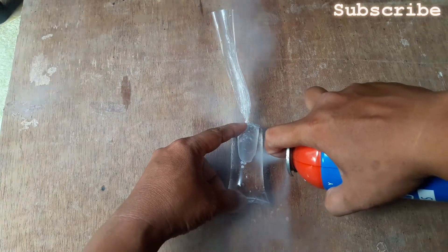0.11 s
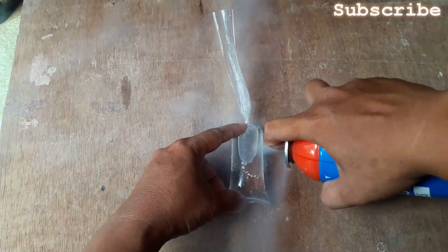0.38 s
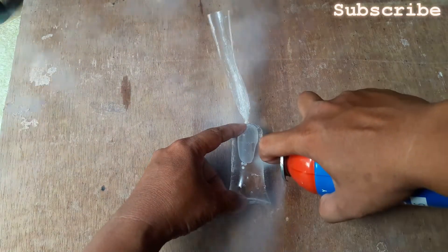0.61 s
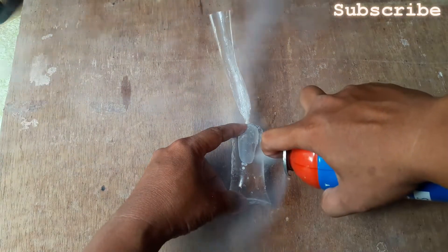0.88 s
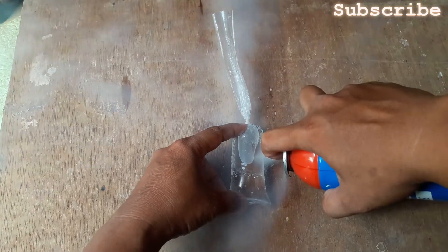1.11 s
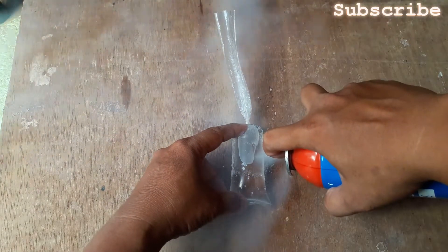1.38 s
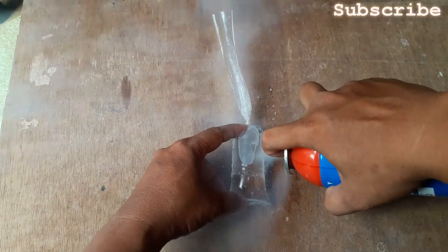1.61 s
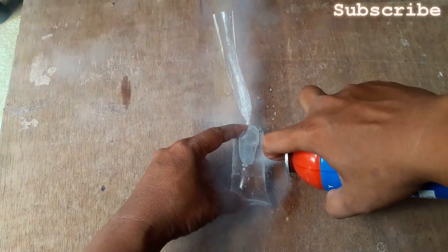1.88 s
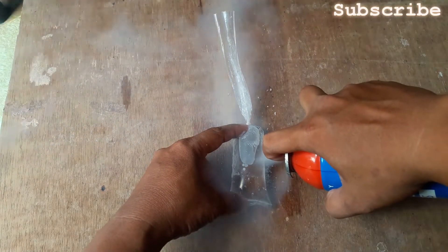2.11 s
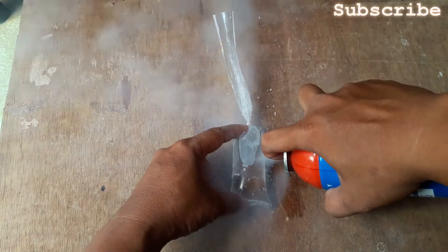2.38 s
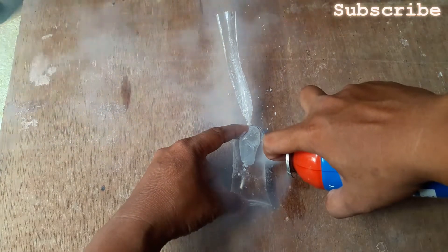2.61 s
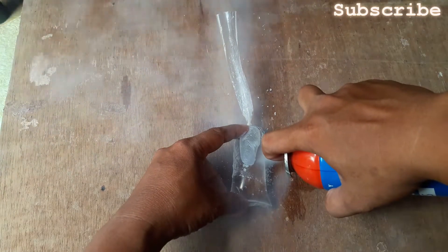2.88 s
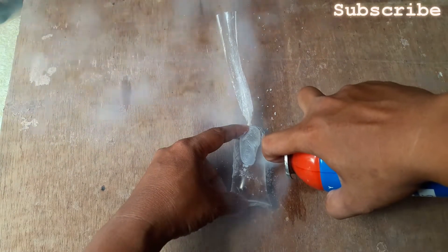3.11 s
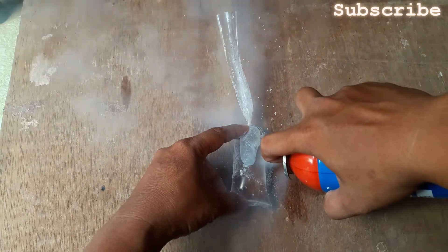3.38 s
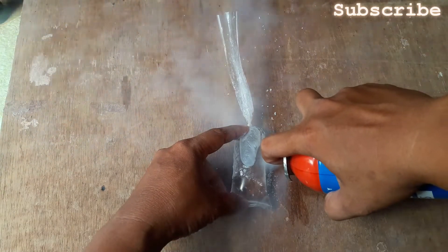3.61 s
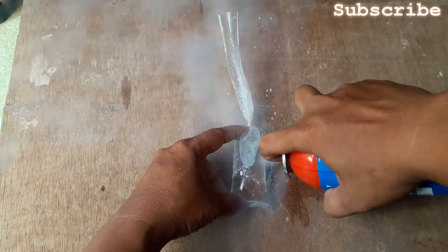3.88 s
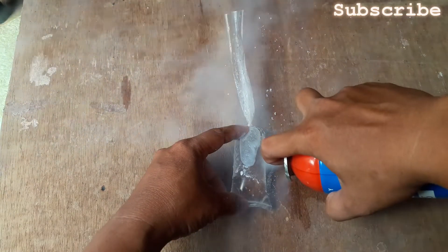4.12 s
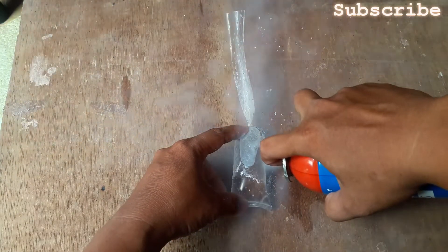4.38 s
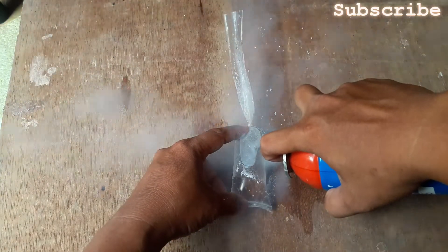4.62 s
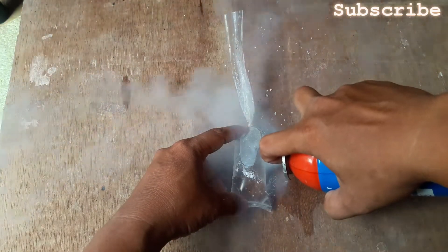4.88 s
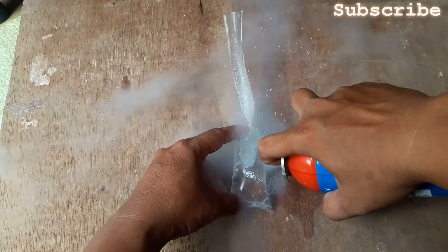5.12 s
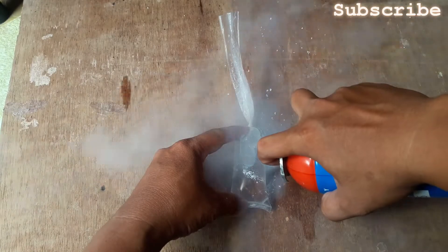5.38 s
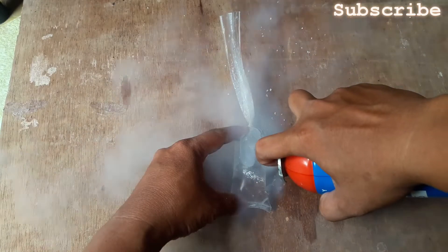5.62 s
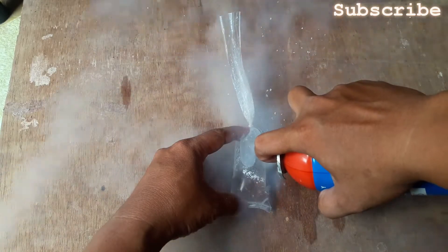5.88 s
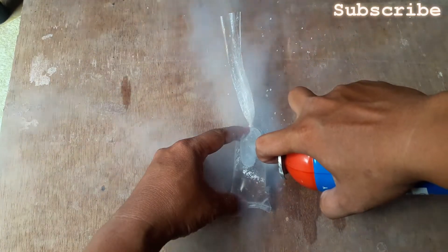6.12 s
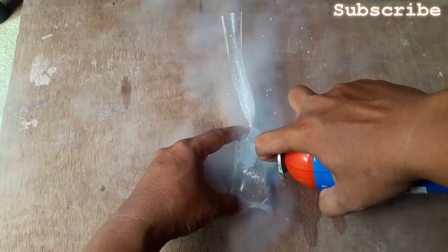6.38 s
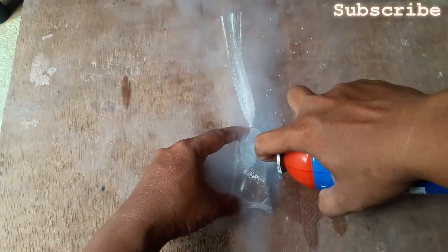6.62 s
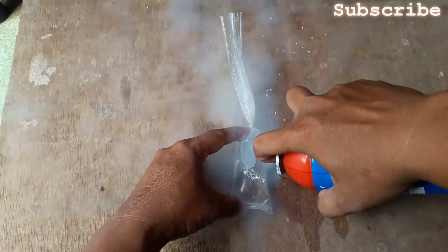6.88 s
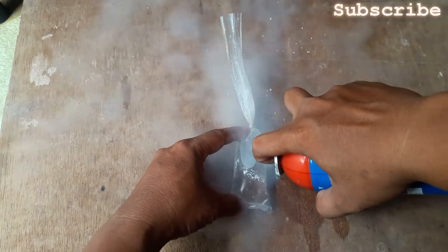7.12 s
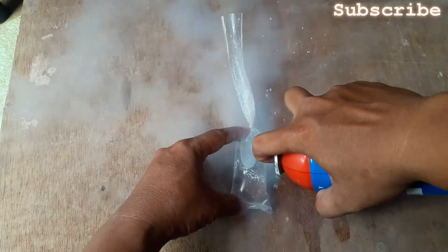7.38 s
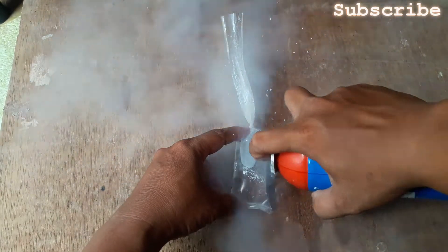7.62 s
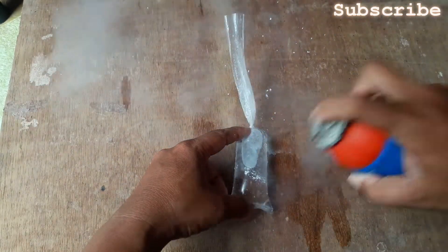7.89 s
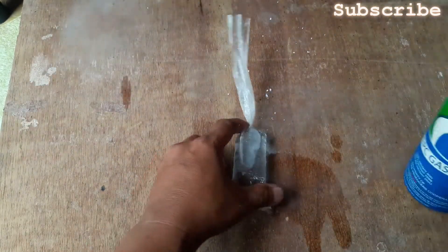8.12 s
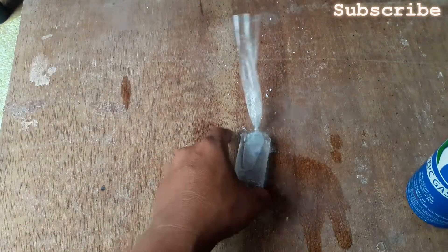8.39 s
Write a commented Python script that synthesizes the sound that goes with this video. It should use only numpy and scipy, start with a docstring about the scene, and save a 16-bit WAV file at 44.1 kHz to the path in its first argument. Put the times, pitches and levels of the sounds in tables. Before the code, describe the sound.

Very close to a stereo microphone, a gas can sprays a small water bag on a wooden table. The dense, bright hiss holds almost steady, with slight flutter and one brief spurt early on. It shuts off suddenly, leaving a quiet room, faint plastic ticks, a tiny squeak and rustling, then a hollow knock with a weaker touch as the can is set down.

```python
"""A gas canister sprays a steady jet against a small bag of water on a wooden table, close to a two-port microphone.
The jet is noise coloured for each port, with swell and flutter by band; a brief spurt is a second, louder noise.
The valve shuts; the chilled bag ticks (ringing snaps), squeaks (a gliding sine) and rustles (grainy noise).
The can is put down on the table with a hollow knock: soft clicks set the table's modes ringing.
A faint room noise, mains hum and a low drone, the last two made of sines, lie underneath."""
import sys
import numpy as np
from scipy import signal
from scipy.fft import rfft, irfft, next_fast_len
from scipy.io import wavfile

SR = 44100
rng = np.random.default_rng(int(sys.argv[2]) if len(sys.argv) > 2 else 0)


def to_wav(s):
    """Save 16-bit WAV."""
    ch = np.atleast_2d(s).T  # columns
    pcm = np.round(np.clip(ch, -1, 1) * 32767)  # PCM
    wavfile.write(sys.argv[1], SR, pcm.astype(np.int16))


def voltage_ratio(decibels):
    """Convert decibels (scalar or array-like) to amplitude ratios, 20 dB per decade."""
    exponent = np.asarray(decibels, float) / 20
    return 10 ** exponent


N = 375291
TIME = np.arange(N) / SR
SIZE = next_fast_len(N + SR // 4)  # room for a quarter second of echo
HZ = np.maximum(np.arange(SIZE // 2 + 1) * SR / SIZE, 1)

SHUT_S = 7.625  # the valve shuts
BASS_THINS_S, BASS_THINS_OVER_S = 1.3, 0.03  # the bass thins abruptly
# how far the left port leads the right: f/Hz, phase/rad
PORT_LEAD = [(100, -1), (3400, 0.5), (4200, 2), (5200, 0.84), (6300, 0.5), (8500, 3), (10200, -0.5),
             (12300, -2.5), (15300, 1.5)]


def rms_one(x):
    """Scale to unit rms of the two ports' mean."""
    return x / np.sqrt(np.mean(np.atleast_2d(x).mean(axis=0) ** 2) + 1e-20)


def heard(spectrum):
    """Spectrum back to samples."""
    return irfft(spectrum, SIZE)[..., :N]


def ramp(start_s, over_s):
    """Straight line from 0 to 1."""
    return np.clip((TIME - start_s) / over_s, 0, 1)


def in_time(rows):
    """Columns of a table as curves over all samples."""
    s, *columns = np.transpose(rows)
    return [np.interp(TIME, s, c) for c in columns]


def over_hz(points):
    """A two-column table read along log frequency."""
    hz, value = np.array(points).T
    return np.interp(np.log(HZ), np.log(hz), value)


def peaks_db(ripple):
    """Bell-shaped peaks and notches along frequency; each width is taken at half the dB height."""
    return sum(db / (1 + (2 * (HZ - hz) / width) ** 2) for hz, width, db in ripple)


def drift(rate):
    """Slow random wander of unit rms: noise through two equal low-pass poles at rate Hz."""
    step = 40  # samples from one drawn value to the next
    pole = np.exp(-2 * np.pi * rate * step / SR)
    noise = rng.standard_normal(N // step + 2002)
    slow = signal.lfilter([1], [1, -2 * pole, pole * pole], noise)[2000:]
    return np.interp(np.arange(N) / step, np.arange(len(slow)), rms_one(slow))


def ring(clicks, hz, t60):
    """Damped resonance: a unit click sets a sine of height 1 ringing, 60 dB down after t60 seconds."""
    radius = voltage_ratio(-60 / (t60 * SR))
    w = 2 * np.pi * hz / SR
    return signal.lfilter([0, np.sin(w)], [1, -2 * radius * np.cos(w), radius * radius], clicks + 1e-18)


def two_port_noise(alike, lead):
    """Spectra of white noise at both ports: a shared part, shifted in phase, and a part of their own."""
    shared, *own = rfft(rng.standard_normal((3, SIZE)))
    alike = np.clip(alike, 0, 1)
    shared_at_ports = shared * np.exp(0.5j * lead * [[1], [-1]])
    return np.sqrt(alike) * shared_at_ports + np.sqrt(1 - alike) * np.array(own)


def echoes(t60, level_db, alike_below_hz=700):
    """A dying spray of reflections, another one for each port; long waves pass with little of it."""
    t = np.arange(SR // 4) / SR
    tail = rng.standard_normal((2, len(t))) * voltage_ratio(-60 * t / t60) * (t > 0.001)
    tail *= voltage_ratio(level_db) / np.sqrt(np.sum(tail ** 2, axis=1, keepdims=True))
    return rfft(tail, SIZE) * HZ / np.hypot(HZ, alike_below_hz)


def jet(swell_db=0.17, patchy_db=0.5, flutter_db=0.51, spit_db=0.5, near_t60=0.044, near_db=-6):
    """Turbulent noise; the flow swells as a whole, wanders and flutters by band, spits as droplets pass the nozzle."""
    # broad colour of the jet at each port: f/Hz, relative level/dB
    colour_left = [(30, -51), (100, -49.5), (300, -31.5), (480, -22.5), (600, -15.5), (680, -11.5),
                   (1500, -3.5), (3500, 1.7), (4000, -2), (4150, -6.5), (5300, -12), (6500, -10),
                   (9000, -28), (12000, -9), (15600, -2)]
    colour_right = [(30, -50), (100, -49), (300, -29.5), (480, -23), (600, -19), (680, -9), (1500, -5),
                    (3500, 0), (4000, -5.5), (4150, -9.5), (5300, -17.5), (6500, -21), (9000, -20),
                    (12000, -4), (15600, 0)]
    # peaks and notches from bag, hands and table top on the way to each port: f/Hz, width/Hz, height/dB
    ripple_left = [(575, 155, -3.5), (824, 47, 7.5), (970, 110, 4), (1063, 69, -5), (1254, 130, -8.5),
                   (1338, 126, -10.5), (1540, 39, -6), (1682, 35, -16), (1970, 105, 4.5), (2206, 61, -12.5),
                   (2230, 84, -2), (2670, 100, 6.5), (2840, 72, -2.5), (2940, 120, -3.5), (3720, 260, 2),
                   (3898, 385, 7.5), (5500, 120, -10), (6640, 250, 3), (7500, 150, 5), (11240, 300, 5.5)]
    ripple_right = [(560, 66, 3.5), (600, 42, -3.5), (890, 39, -3), (1037, 40, 6.5), (1203, 69, -6.5),
                    (1493, 35, -15.5), (1630, 72, -12.5), (1870, 110, -3), (2070, 81, -4.5), (2260, 60, 3),
                    (2460, 88, 6), (2680, 126, -13.5), (3620, 91, -1), (3765, 82, 5), (4326, 450, 8),
                    (6160, 105, 5.5), (6200, 130, 10), (6260, 140, 4.5), (8160, 1200, 8), (9800, 440, -3.5)]
    # what is added while the can is still held in its first position: f/Hz, width/Hz, height/dB
    early_left = [(344, 590, 0.5), (810, 120, -3), (930, 120, -3.5), (1246, 130, 10), (1526, 190, 5.5),
                  (2640, 160, -3), (3520, 930, -2.5), (4310, 220, 1), (5510, 430, 5), (6100, 370, -6.5),
                  (6840, 250, 1.5), (12400, 280, -7)]
    early_right = [(353, 130, 2.5), (820, 100, -3.5), (1500, 120, 7), (1845, 280, 4.5), (3070, 540, -1),
                   (4000, 200, -7.5), (4530, 200, 6), (5200, 510, 4), (6020, 190, -17), (6700, 180, 10.5),
                   (8280, 410, -5.5), (9540, 150, 1.5)]
    # share of the direct jet that both ports hear alike: f/Hz, likeness/0-1
    likeness = [(60, 1), (300, 0.99), (1000, 0.79), (2500, 0.7), (4000, 0.79), (7000, 0.44), (11000, 0.75),
                (15500, 0.55)]
    # thumb on the valve and pressure in the cooling can; only the swing about the mean counts:
    # t/s, flow/dB, pressure as brightness/dB
    flow_rows = [(0.0, -18.5, -7), (0.29, -21, -2), (0.47, -18, -2), (0.55, -22.5, 0), (0.63, -21.5, -2),
                 (0.93, -20.5, 1.5), (1.31, -19.5, 0), (1.75, -19.5, 0.5), (2.09, -19, -3.5),
                 (2.14, -20.5, 1), (2.75, -19, -4), (2.84, -21, -1.5), (3.05, -20, -2.5), (5.42, -20, -5),
                 (7.54, -20.5, -3.5), (7.6, -21, -3.5)]
    # bands from low to high: level/dB, share of flow swing, share of pressure swing, drift of level/dB per s,
    # gain in the first position/dB
    jet_bands = [(-58, .3, 0.23, -.5, 0.5), (-53, .3, 0, 0, 4), (-31.5, 0.43, 0, -0.07, 2),
                 (-22.5, 1.1, 0.21, 0, -1), (-32.5, 1.4, 0.5, -.2, -1), (-30, 0.56, 0, 0.35, 2.5),
                 (-27, 0.99, 0.95, 0, -1), (-23.5, .9, 1.1, -2.1, -7.5)]
    # crossings between those bands: f/Hz
    band_edges_hz = [260, 500, 1700, 4100, 5500, 9000, 12500]
    # how much louder each band is until the bass thins: gain/dB
    bass_extra_db = [8, 3] + [0] * 6
    settles_from_s, settles_over_s = 1.54, 2.16
    fall_db_per_s = 700

    colour_db = [over_hz(colour_left) + peaks_db(ripple_left), over_hz(colour_right) + peaks_db(ripple_right)]
    direct = two_port_noise(over_hz(likeness), over_hz(PORT_LEAD)) * voltage_ratio(np.array(colour_db))

    # as the hands shift, one pattern of near reflections slowly gives way to another
    turn = 1.33 * drift(0.25)
    near = heard(direct * echoes(near_t60, near_db)) * np.cos(turn)
    near = near + heard(direct * echoes(near_t60, near_db)) * np.sin(turn)
    spectrum = direct + rfft(near, SIZE)

    early = voltage_ratio(np.array([peaks_db(early_left), peaks_db(early_right)]))
    first = 1 - ramp(settles_from_s, settles_over_s)
    spectrum = spectrum + rfft(heard(spectrum * (early - 1)) * first, SIZE)

    # after the shut-off the last gas and the room's echo linger at a lower level
    after = np.maximum(TIME - SHUT_S, 0)
    shut_db = np.maximum(-fall_db_per_s * after, -15 - 200 * after)
    whole_db = swell_db * drift(7.5) + spit_db * drift(210) + shut_db

    flow, pressure = [c - c.mean() for c in in_time(flow_rows)]
    bass = 1 - ramp(BASS_THINS_S, BASS_THINS_OVER_S)
    # low-pass curves; the difference of two neighbours is one band
    below = [0] + [1 / (1 + (HZ / hz) ** 12) for hz in band_edges_hz] + [1]
    out = 0
    for low, high, extra_db, row in zip(below, below[1:], bass_extra_db, jet_bands):
        db, by_flow, by_pressure, sag, first_db = row
        level_db = db + by_flow * flow + by_pressure * pressure + sag * (TIME - SHUT_S / 2)
        level_db = level_db + first_db * first + extra_db * bass
        chance_db = patchy_db * drift(0.84) + flutter_db * drift(9.7)
        band = rms_one(heard(spectrum * (high - low)))
        out = out + band * voltage_ratio(level_db + whole_db + chance_db)
    return out


def spurt():
    """Extra liquid passes the nozzle for a moment: a coloured noise that rises, holds and falls."""
    # colour of the spurt: f/Hz, relative level/dB
    spurt_colour = [(1500, -31), (2400, -1), (3000, 4), (3700, -13), (4700, 9), (5300, -19), (7000, -30)]
    start_s, hold_s, level_db = 0.413, 0.075, -24
    rise_db_per_s, fall_db_per_s = 250, 300
    noise = heard(two_port_noise(0.77 + 0 * HZ, over_hz(PORT_LEAD)) * voltage_ratio(over_hz(spurt_colour)))
    lost_db = rise_db_per_s * np.maximum(start_s - TIME, 0)
    lost_db = lost_db + fall_db_per_s * np.maximum(TIME - start_s - hold_s, 0)
    return rms_one(noise) * voltage_ratio(level_db - np.minimum(lost_db, 120) + 1.1 * drift(60))


def bag(ring_db=-4, snap_db=-14):
    """Each tick is a faint broad snap and a soft ring of a few cycles; one squeak; a grainy rustle, faint crackles."""
    # ticks of the chilled bag: t/s, level/dB, f/Hz, cycles until each of two chained rings is 60 dB down,
    # left over right/dB
    ticks = [(7.7697, -28.5, 2100, 12, -9), (7.9187, -29, 5180, 3.7, 7), (8.0073, -32, 2250, 3.4, -1),
             (8.0394, -34, 2940, 3, -1.0), (8.0615, -29, 4120, 3.7, 6), (8.1163, -29, 3560, 2.6, -10),
             (8.2013, -34, 4260, 2.6, -4), (8.2501, -31, 4730, 3, -9), (8.2573, -35, 2120, 2.4, -11),
             (8.288, -29, 6450, 2.5, -13)]
    # hands and bag rustle, audible once the jet is off: t/s, level/dB
    rustle_rows = [(7.72, -58), (7.85, -57.5), (7.984, -53.5), (8.144, -51), (8.326, -53.5), (8.51, -54)]
    squeak_s, squeak_length_s, squeak_db = 7.884, 0.035, -51
    squeak_hz, squeak_drop_hz = 5800, 230
    crackles_per_s, crackle_db, crackle_band_hz = 45, -50, (2000, 9000)

    tick_sound, t = np.zeros((2, N)), np.arange(800) / SR
    for s, db, hz, cycles, pan_db in ticks:
        snap = rng.standard_normal(800) * voltage_ratio(-60 * t / 0.0076)
        t60 = max(cycles, 1) / hz
        ringing = ring(ring(snap, hz, t60), hz, t60)
        tick = voltage_ratio(ring_db) * ringing / np.abs(ringing).max()
        # the snap is stronger in the higher ticks
        tick = tick + voltage_ratio(snap_db) * (hz / 5000) * np.diff(snap, prepend=0) / 2
        at = round(s * SR)
        tick_sound[:, at:at + 800] += tick * voltage_ratio(db + pan_db / 2 * np.array([[1], [-1]]))

    along = ramp(squeak_s, squeak_length_s)
    hz = squeak_hz - squeak_drop_hz * along ** 4
    height = np.clip(8 * along * (1 - along), 0, 1) * voltage_ratio(squeak_db + 3 * drift(120))
    squeak = height * np.sin(2 * np.pi * np.cumsum(hz) / SR)

    crinkle_db = over_hz([(700, -1.5), (2000, -8), (4500, -2.5), (9000, -12), (15500, -14)])
    crinkle = heard(two_port_noise(0.5 + 0 * HZ, 0 * HZ) * voltage_ratio(crinkle_db))
    rustle = rms_one(crinkle) * voltage_ratio(in_time(rustle_rows)[0] + 1.9 * drift(18) + 1.5 * drift(200))

    # crackles fall at random from the first tick on
    born = (rng.random(N) < crackles_per_s / SR) * (TIME > ticks[0][0])
    size_db = crackle_db + 4.5 * np.minimum(rng.exponential(1, N), 3) + rng.normal(0, 3, (2, N))
    band = signal.butter(2, crackle_band_hz, "band", fs=SR, output="sos")
    crackle = signal.sosfilt(band, born * voltage_ratio(size_db) + 1e-18)
    return tick_sound + squeak + rustle + crackle


def knock(contact_hz=1300, radiates_above_hz=440):
    """Soft touches of the rim ring the table's modes; the thin top radiates little bass; the room answers."""
    # rim of the can meets the table: t/s, click level/dB, left over right/dB
    touches = [(8.3203, -7, -4), (8.3236, -10, 13), (8.3275, -8.5, -3), (8.389, -29, -2)]
    # modes of table top and can: f/Hz, level/dB, t60/s
    modes = [(474, -26.5, 0.42), (524.6, -21.5, 0.28), (566, -16, 0.11), (651, -30, .12), (790, -8.5, 0.08),
             (877, -4, 0.059), (924, -23, 0.18), (1030, -17, 0.068), (1120, -11, 0.032), (1320, -30, 0.071),
             (1414, -6.5, 0.035), (1550, -34, 0.083), (1625, -5.5, 0.03), (1793, -35, .12),
             (2040, -26, 0.17), (2250, -12, .02), (2580, -16, .02)]
    # the hand presses the can flat and the ringing is damped
    pressed_s, pressed_over_s, pressed_db = 8.408, 0.012, -9

    clicks = np.zeros((2, N))
    for s, db, pan_db in touches:
        clicks[:, round(s * SR)] = -voltage_ratio(db + pan_db / 2 * np.array([1, -1]))
    soft = signal.sosfilt(signal.butter(4, contact_hz, fs=SR, output="sos"), clicks)
    soft = signal.sosfilt(signal.butter(6, radiates_above_hz, "high", fs=SR, output="sos"), soft)
    rings = sum(voltage_ratio(db) * ring(soft, hz, t60) for hz, db, t60 in modes)
    rings = rings * voltage_ratio(pressed_db * ramp(pressed_s, pressed_over_s))
    return heard(rfft(rings, SIZE) * (1 + echoes(0.18, -3.5)))


def room_noise():
    """Steady coloured noise, alike at both ports in the bass only."""
    # colour of the room: f/Hz, relative level/dB
    room_colour = [(20, -25), (50, -4), (130, 0.5), (300, 1.5), (900, -1), (1300, -5), (2200, -1),
                   (4500, -26), (8000, -34), (16000, -36)]
    level_db = -54.5
    alike = over_hz([(60, 1.0), (1000, 0.16), (8000, 0.13)])
    noise = heard(two_port_noise(alike, 0 * HZ) * voltage_ratio(over_hz(room_colour)))
    return voltage_ratio(level_db + 1.16 * drift(5.6)) * rms_one(noise)


def mains_hum():
    """Steady sines, each wandering a little in level and phase, the same at both ports."""
    # tones, level before the swells below: f/Hz, rms level/dB
    tones = [(59.2, -68), (118.4, -71), (236.9, -70.5), (474, -75), (592, -77), (890, -72), (1010, -73)]
    # louder until the bass thins, and a little louder once the jet is off
    early_db, after_db = 13, 5
    swell_db = early_db * (1 - ramp(BASS_THINS_S, BASS_THINS_OVER_S)) + after_db * ramp(SHUT_S, 0.1)
    out = 0
    for hz, db in tones:
        height = np.sqrt(2) * voltage_ratio(db + swell_db + 2.0 * drift(2.4))
        out = out + height * np.sin(2 * np.pi * hz * TIME + 1.13 * drift(3.5))
    return out


def drone():
    """A low sine of wavering pitch that comes and goes over a faint floor."""
    # bell-shaped swells, added to the floor: middle t/s, half length/s, rms level/dB
    swells = [(0.0, 0.34, -53), (.7, 0.33, -61), (1.25, 0.1, -60), (2.0, 0.36, -64), (2.7, 0.22, -61),
              (3.25, 0.39, -59.5), (4.4, 0.32, -64.5), (5.3, 0.45, -58), (6.8, .3, -66), (7.3, 0.18, -67)]
    middle_hz, waver_hz, floor_db = 99, 1.27, -73
    height = voltage_ratio(floor_db)
    for s, half, db in swells:
        height = height + voltage_ratio(db) * np.exp(-((TIME - s) / half) ** 2)
    hz = middle_hz + waver_hz * drift(2.0)
    return np.sqrt(2) * height * np.sin(2 * np.pi * np.cumsum(hz) / SR)


def scene():
    """All sources at the two ports."""
    return jet() + spurt() + bag() + knock() + room_noise() + mains_hum() + drone()


def roll_off(x):
    """The treble ends steeply here."""
    return signal.sosfilt(signal.butter(12, 16620, fs=SR, output="sos"), x)


def record(dry):
    """The microphone signal, its top cut steeply."""
    cutoff_hz = 15780
    mix = heard(rfft(dry, SIZE) * (HZ < cutoff_hz))
    return roll_off(mix)


dry = scene()
out = record(dry)
to_wav(out)
```